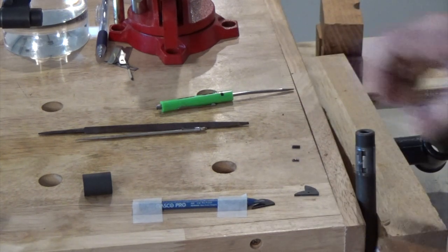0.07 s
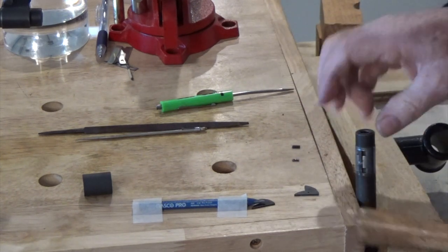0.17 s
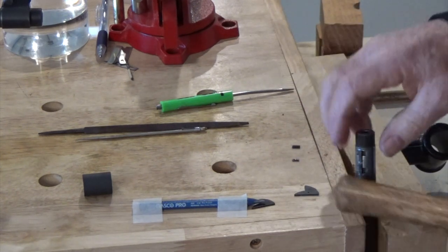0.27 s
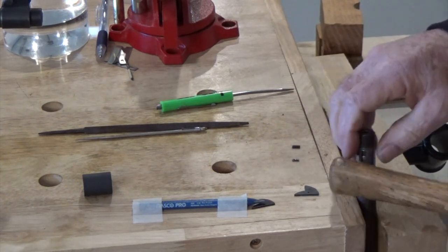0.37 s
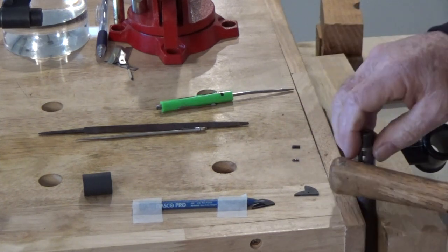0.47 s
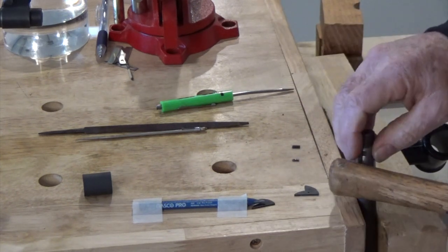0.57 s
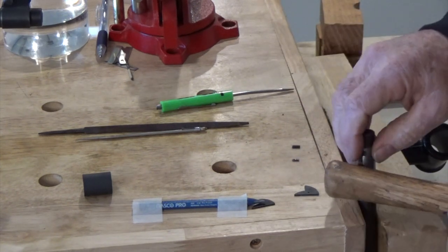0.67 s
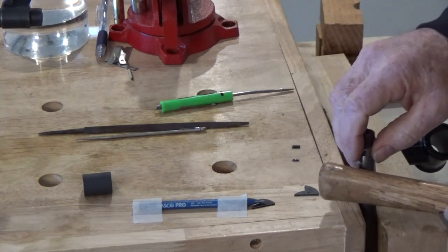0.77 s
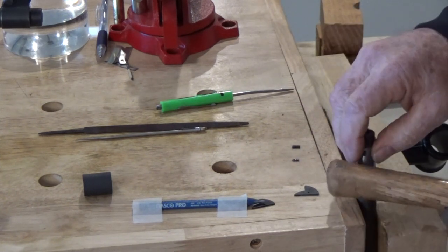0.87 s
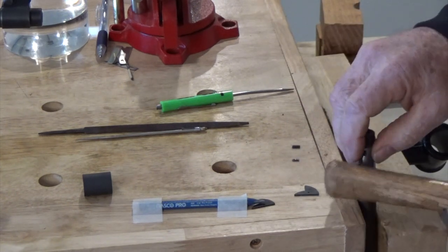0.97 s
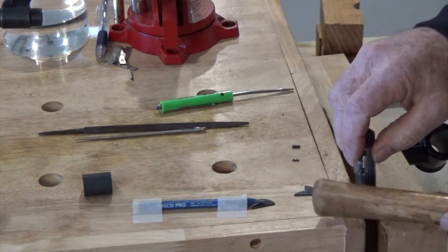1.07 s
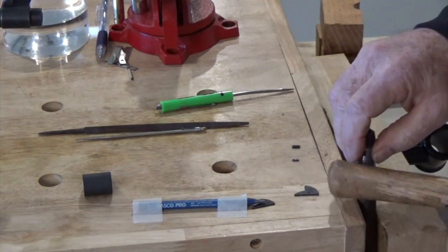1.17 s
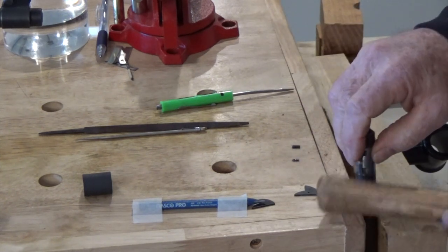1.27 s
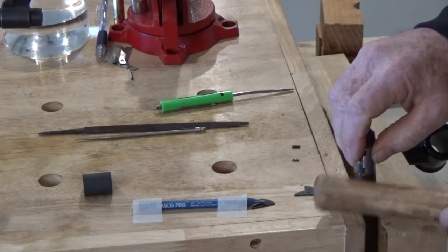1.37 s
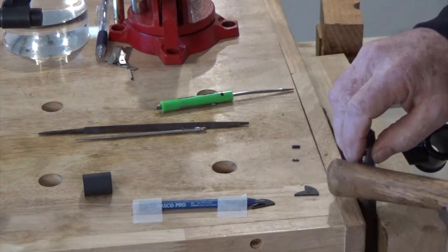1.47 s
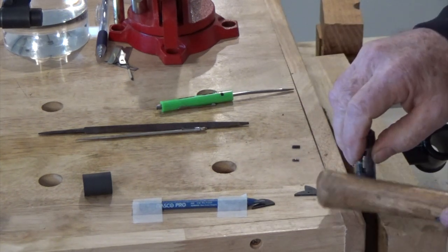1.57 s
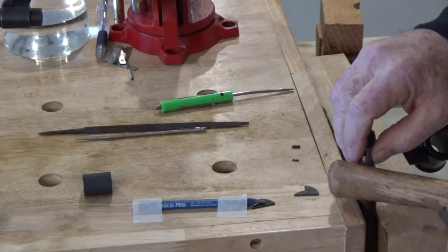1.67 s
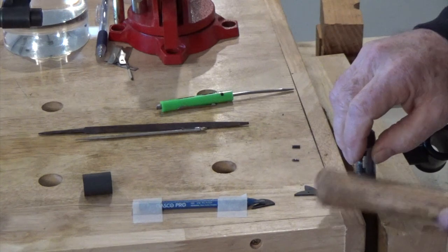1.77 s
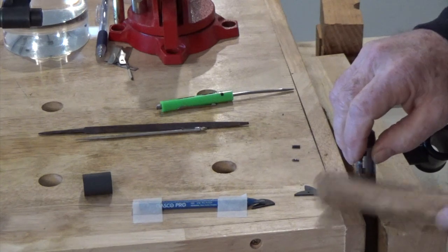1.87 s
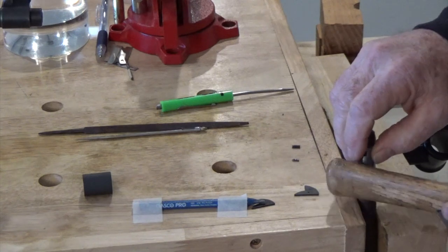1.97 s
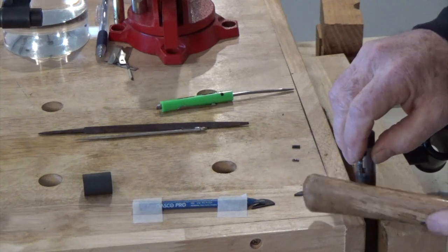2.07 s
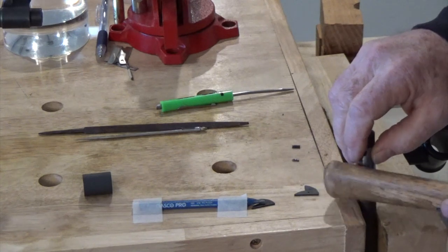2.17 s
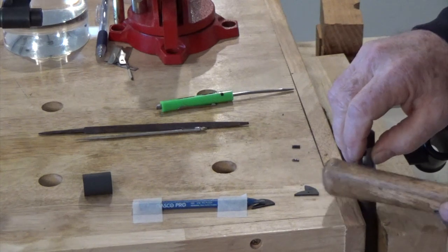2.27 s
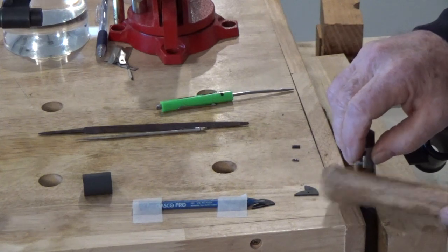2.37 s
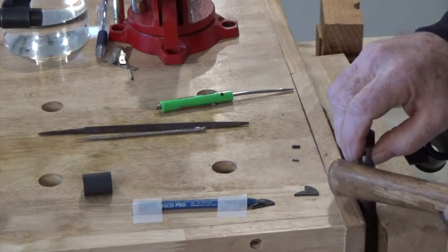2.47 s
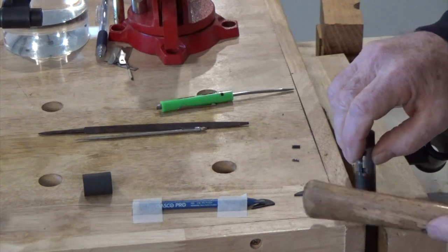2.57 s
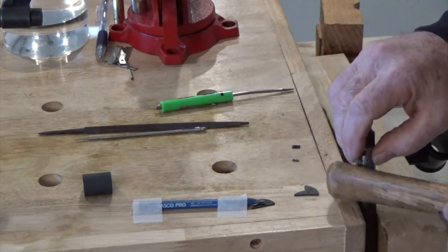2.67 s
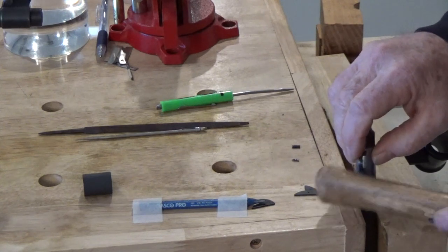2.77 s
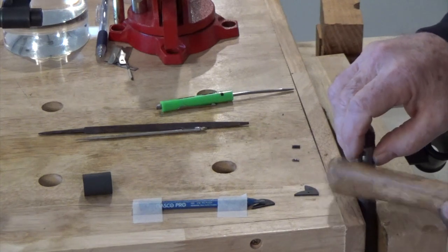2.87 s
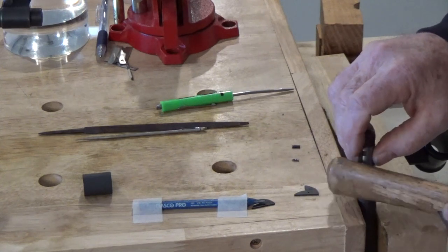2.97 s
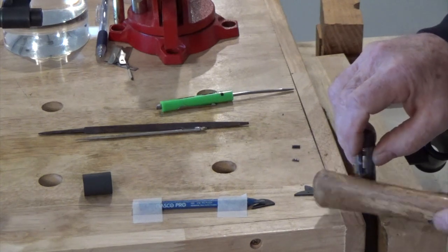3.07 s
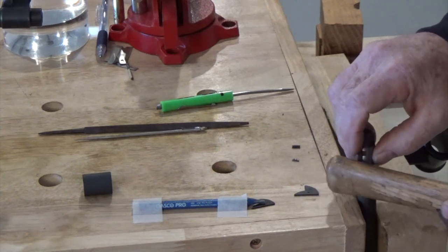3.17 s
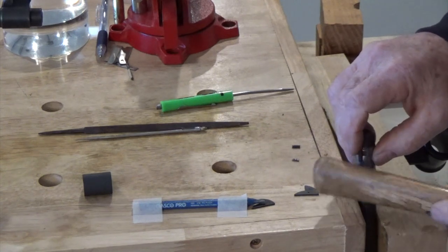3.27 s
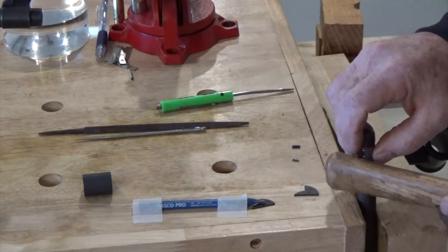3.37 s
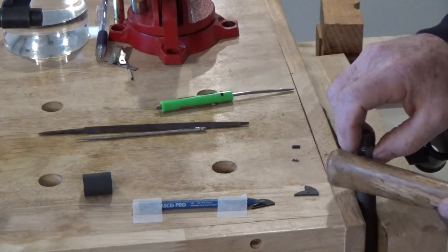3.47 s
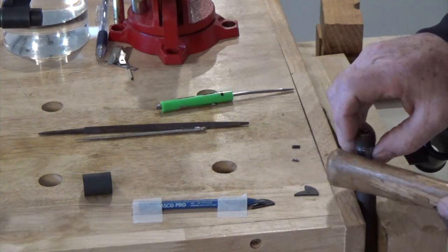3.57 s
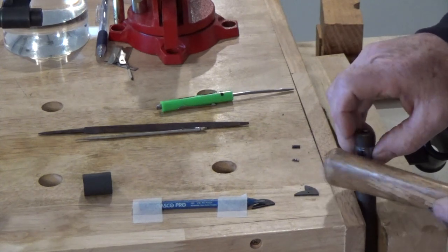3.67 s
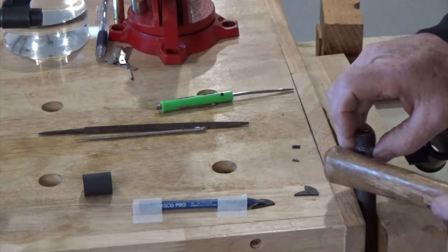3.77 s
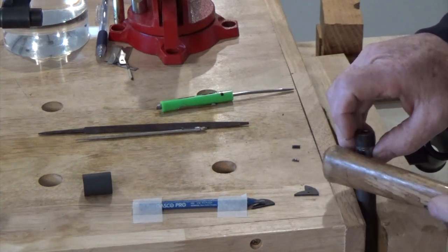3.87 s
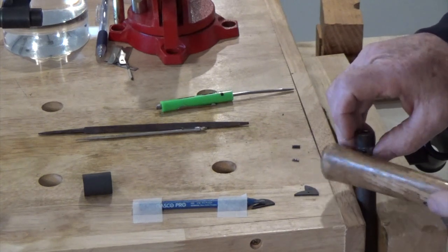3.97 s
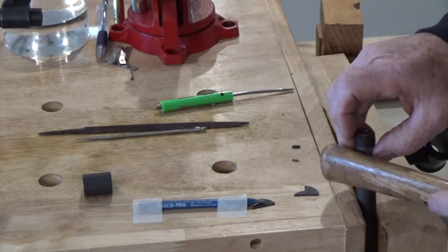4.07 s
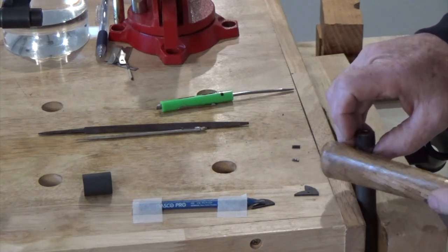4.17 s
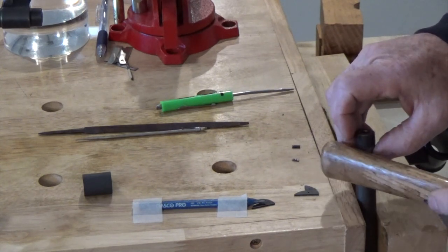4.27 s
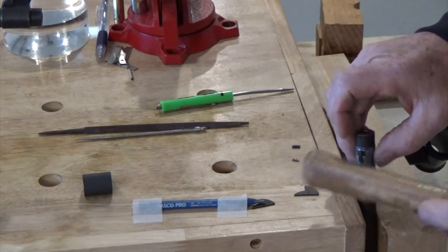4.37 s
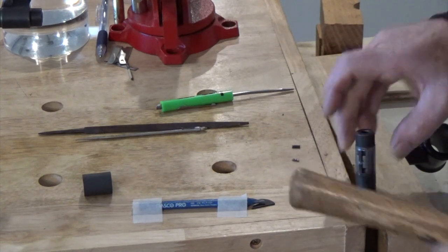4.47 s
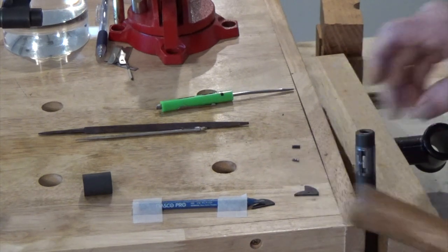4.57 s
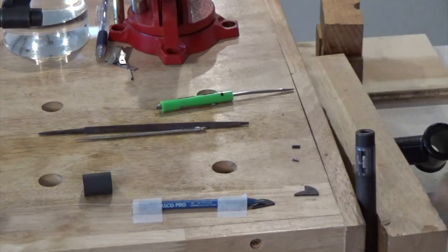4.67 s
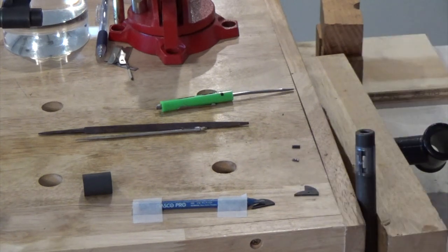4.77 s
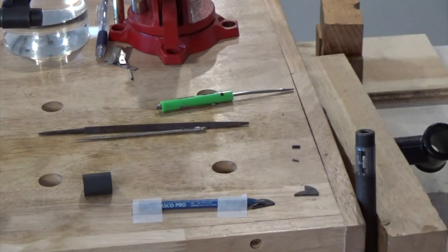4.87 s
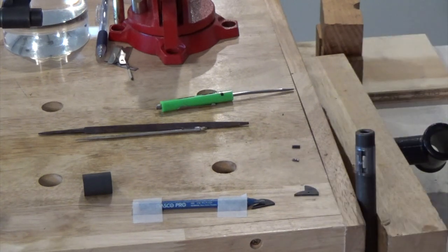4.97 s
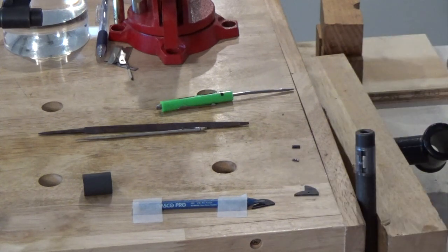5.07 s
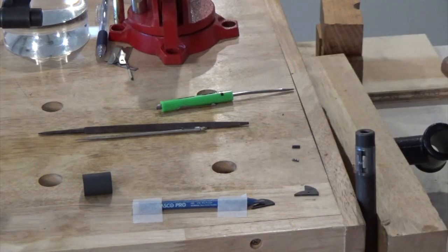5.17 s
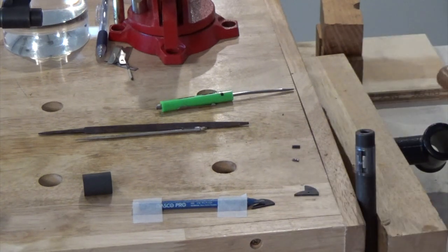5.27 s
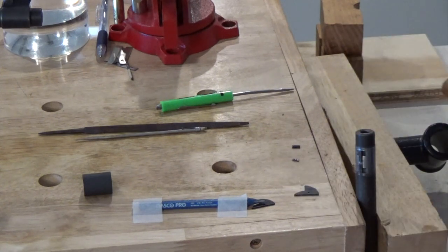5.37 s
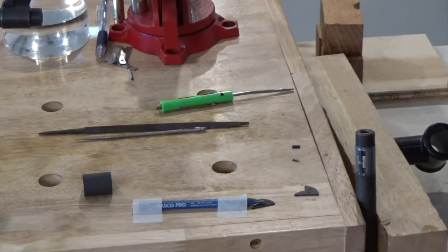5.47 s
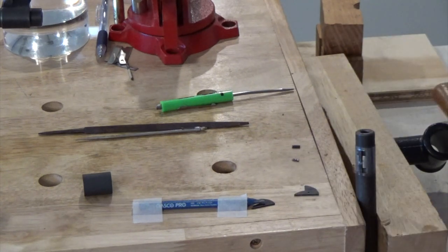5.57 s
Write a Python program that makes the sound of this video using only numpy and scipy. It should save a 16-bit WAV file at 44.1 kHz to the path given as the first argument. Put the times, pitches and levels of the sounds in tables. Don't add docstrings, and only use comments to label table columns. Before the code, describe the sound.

Faint room hiss and a barely audible brush of skin, then sixteen quick mallet blows, each a dry snap, short metal clank and bench knock with little deep bass. Some are light or doubled, others loud and flattened. Hard walls give slap echoes and a reverberant tail. After about a second's pause, a small woody clatter ends it, all heard close in stereo.

```python
import sys
import numpy as np
from scipy import signal
from scipy.fft import rfft, irfft, next_fast_len
from scipy.io import wavfile

SR = 44100
rng = np.random.default_rng(int(sys.argv[2]) if len(sys.argv) > 2 else 0)


def file_out(sig):
    cols = np.atleast_2d(sig).T
    lim = np.clip(cols, -1, 1)
    pcm = np.round(lim * 32767).astype(np.int16)
    wavfile.write(sys.argv[1], SR, pcm)


def decibels_to_gain(level_db):
    exponent = np.asarray(level_db, float) / 20
    return 10 ** exponent


N = 247401

# (push in seconds, spread of starting phase in radians).
STEEL_CONTACT = (0.00004, 0.15)
WOOD_CONTACT = (0.0013, 0.44)
BENCH_CONTACT = (0.0057, 0.25)


def ring(modes, push_s, spread_rad, scatter_db=1.0):
    hz, db, t60 = np.transpose(modes)[:, :, None]
    tuning, energy, turn = rng.standard_normal((3, len(modes), 1))
    t = np.arange(int(t60.max() * SR)) / SR
    phase = np.pi * np.arange(len(modes))[:, None] + spread_rad * turn
    decay = decibels_to_gain(db + scatter_db * energy - 60 * t / t60)
    sines = np.sin(2 * np.pi * hz * (1 + 0.0068 * tuning) * t + phase) * decay
    push = 1 - np.exp(-t / push_s)
    return sines.sum(axis=0) / np.sqrt(len(modes)) * push


def strikes(table, bodies):
    out = np.zeros(N + SR)
    for s, *levels in table:
        for db, (modes, contact) in zip(levels, bodies):
            blow = ring(modes, *contact)
            start = int(s * SR)
            out[start:start + len(blow)] += decibels_to_gain(db) * blow
    return out[:N]


# start in seconds, force into
# the bench in dB, share reaching the steel in dB, contact tick against force in dB, sideways pull on the vise in dB.
BLOWS = [(0.5713, -43.5, -14.5, -17, -17.5), (0.843, -24.5, -11.5, -17, -7), (1.1324, -17.5, 9, -16.5, 1.5),
         (1.4064, -15, -7.5, -15, 3), (1.6395, -9.5, -1.5, -18.5, -10.5), (1.893, -10, 9.5, -12.5, -1.5),
         (2.151, -26.5, -8, -25, 16.5), (2.3873, -12.5, 10, -5.5, -2.5), (2.6389, -23, -6.5, -12.5, -9),
         (2.8777, -11, 2.5, -10.5, 2), (3.1153, -8.5, 3, -6.5, 1), (3.3461, -23, -13.5, -20, 3.5),
         (3.5634, -11, 1, -25.5, -5), (3.7704, -6.5, 4, -9.5, -1), (3.9694, -11.5, 3, -12, 1),
         (4.1763, -10, -0.9, -18, -0.5)]
# frequency in Hz, level in dB, t60 in seconds.
STEEL_CLANK = [(2597, 9, 0.0049), (2916, 5.5, 0.02), (2957, 10, 0.012), (3827, 13.5, 0.0034),
               (4323, 12, 0.0038), (4856, 10, 0.0054), (5650, 7.5, 0.0035), (6220, 6.5, 0.0041),
               (6163, 4, 0.0077), (6910, 1.5, 0.0047), (8460, -8.5, 0.005), (10430, -10.5, 0.0044)]
# frequency in Hz, level in dB, t60 in seconds.
BENCH_KNOCK = [(565, 2, .02), (654, 4.5, 0.011), (789.5, 5, 0.04), (791, -10, 0.051), (855.4, 1.5, 0.022),
               (1063, 9, 0.013), (1247, 7.5, 0.02), (1275, 5.5, 0.029), (1384, -4.5, 0.11),
               (1398, -6.5, 0.073), (1566, 11, 0.013), (1783, 3.5, 0.0079), (2234, 13, .006)]
# frequency in Hz, level in dB, t60 in seconds.
BENCH_THUD = [(105, 6.5, 0.035), (149.5, -5, 0.15), (208, 9, 0.045), (237.7, 10.5, 0.037),
              (313, 3.5, 0.032), (402.3, 8.5, 0.025), (411.5, 9, 0.028)]
# frequency in Hz, level in dB, t60 in seconds.
VISE_RING = [(1052, 6, 0.033), (1134, 14, 0.0057), (1692, 10.5, 0.011), (1897, 1.5, 0.074),
             (1934, -6.5, 0.1), (1837, 3.5, 0.014), (2305, 3.5, 0.0086)]
# frequency in Hz, level in dB, t60 in seconds.
CONTACT_TICK = [(7890, 15.5, 0.0081), (7900, 9.5, 0.0082), (8870, 18.5, 0.0023), (9900, 9, 0.0084),
                (9760, 11.5, 0.0036), (11240, 13.5, 0.0027), (12500, 11, 0.002), (13500, 5, .002),
                (14450, -9.5, .002)]


def mallet_blows():
    s, force_db, steel_db, tick_db, pull_db = np.transpose(BLOWS)
    thud_db = np.minimum(force_db - 6, -43 + 0.64 * (force_db + 24))
    vise_db = force_db - 5.5 + 1.15 * steel_db + pull_db
    rows = zip(s, force_db + steel_db, force_db, thud_db, vise_db, force_db + tick_db)
    return strikes(rows, [(STEEL_CLANK, STEEL_CONTACT), (BENCH_KNOCK, WOOD_CONTACT), (BENCH_THUD, BENCH_CONTACT),
                          (VISE_RING, WOOD_CONTACT), (CONTACT_TICK, STEEL_CONTACT)])


# start in seconds, steel clank in dB, bench thud in dB, contact tick in dB.
SECOND_CONTACTS = [
    (2.1390, -56.5, -43, -54.5),
    (2.6510, -37, -35, -58),
    (3.338, -44.5, -51.5, -48),
]


def bounces():
    return strikes(SECOND_CONTACTS, [(STEEL_CLANK, STEEL_CONTACT), (BENCH_THUD, BENCH_CONTACT),
                                     (CONTACT_TICK, STEEL_CONTACT)])


# start in seconds, level in dB.
SEATED_BLOWS = [
    (1.640, -35),
    (3.116, -14.5),
    (3.770, -12),
    (3.969, -14.5),
    (4.176, -18.5),
]
# frequency in Hz, level in dB, t60 in seconds.
SEATED_PART = [(1352, -0.5, .08), (1450, -2.5, 0.13), (1456, -7.5, 0.12)]


def seated_part():
    return strikes(SEATED_BLOWS, [(SEATED_PART, WOOD_CONTACT)])


# start in seconds, clank in dB, low knock in dB, mid knock in dB, tick in dB.
LANDINGS = [
    (5.4146, -41, -43, -36, -63),
    (5.4754, -33.5, -23.5, -30, -65),
    (5.496, -37.5, -37, -24.5, -65),
    (5.521, -42, -38, -35.5, -74.5),
    (5.553, -49, -48, -33, -66),
]
# frequency in Hz, level in dB, t60 in seconds.
MALLET_HANDLE = [(150, -15, 0.018), (234, 8.5, 0.028), (353, 7.5, 0.034), (420, 6, 0.026),
                 (531, 5.5, 0.039), (673, 4.5, 0.025)]
# frequency in Hz, level in dB, t60 in seconds.
BENCH_BOARD = [(782, 7.3, 0.019), (826, 6.25, 0.024), (1015, 5.1, 0.015), (1336, 5.8, 0.015),
               (1670, 6.3, 0.0108), (2070, 7.5, 0.011)]


def mallet_laid_down():
    return strikes(LANDINGS, [(STEEL_CLANK, STEEL_CONTACT), (MALLET_HANDLE, WOOD_CONTACT),
                              (BENCH_BOARD, WOOD_CONTACT), (CONTACT_TICK, STEEL_CONTACT)])


# frequency in Hz, level in dB, t60 in seconds.
CONTACT_SNAP = [(3100, 6.5, .003), (4600, 4.5, .003), (7000, -8, .002), (9500, 2, .002), (12020, 0.5, .002),
                (14500, -8, .0015)]


def snaps():
    rows = [(s, force_db - 1.5 - 0.06 * steel_db) for s, force_db, steel_db, *_ in BLOWS]
    rows += [(s, clank_db - 3) for s, clank_db, *_ in LANDINGS[:2]]
    return strikes(rows, [(CONTACT_SNAP, STEEL_CONTACT)])


# centre in Hz, width in Hz, level in dB.
BRUSH_BANDS = [(3900, 170, -74), (4450, 200, -74), (8700, 200, -84)]


def finger_brush():
    start_s, rise_s, end_s = 0.21, 0.11, 0.57
    t = np.arange(N) / SR
    shape = np.clip(np.minimum(t - start_s, end_s - t) / rise_s, 0, 1)
    out = np.zeros(N)
    for hz, width_hz, db in BRUSH_BANDS:
        band = signal.butter(2, [hz - width_hz / 2, hz + width_hz / 2], "band", fs=SR, output="sos")
        rustle = signal.sosfilt(band, rng.standard_normal(N))
        out += decibels_to_gain(db) * rustle / rustle.std()
    return out * shape


# delay in milliseconds, level in dB, left minus right in dB, top in Hz.
WALL_ECHOES = [(4.46, -2, -2, 6900), (8.42, -9.5, 5, 4400), (14.78, -12, -1, 8700), (25.77, -2.5, 2.5, 570),
               (29.12, 8, 1, 720), (127.5, -5.5, 0.5, 1100)]
# frequency in Hz, t60 in seconds, level in dB, side minus mid in dB, left minus right in dB.
ROOM_TAIL = [(100, 0.34, -20.5, -32, 0), (250, 0.73, -23.5, -24, 0.5), (500, 0.63, -18.5, -16, 1),
             (1050, 0.65, -23, -9, 1.5), (1897, 0.69, -28, -9, .5), (4300, 0.6, -29, -10, 0.5),
             (8860, 0.41, -31.5, -15.5, 0), (13000, 0.29, -35, -25.5, 0.5)]


def workshop():
    build_up_s = 0.0047
    scatter_db, scatter_t60_s, scatter_from_hz = 9, 0.026, 390
    t = np.arange(SR) / SR
    left_right = np.array([[1], [-1]])
    out = np.zeros((2, SR))
    out[:, 0] = 1
    for ms, db, pan_db, top_hz in WALL_ECHOES:
        dulling = signal.butter(2, top_hz, fs=SR, output="sos")
        echo = signal.sosfilt(dulling, signal.unit_impulse(SR, int(ms * SR / 1000)))
        out += echo * decibels_to_gain(db + pan_db * left_right / 2)
    hz, *columns = np.transpose(ROOM_TAIL)
    edges = 60 * 2 ** np.arange(0, 8.4, 1 / 3)
    for lo, hi in zip(edges, edges[1:]):
        centre = np.log(lo * hi) / 2
        t60, db, side_db, pan_db = (np.interp(centre, np.log(hz), c) for c in columns)
        band = signal.butter(2, [lo, hi], "band", fs=SR, output="sos")
        mid, side = signal.sosfilt(band, rng.standard_normal((2, SR)))
        pair = decibels_to_gain(pan_db * left_right / 2) * (mid + decibels_to_gain(side_db) * side * left_right)
        tail = decibels_to_gain(-60 * t / t60) * (1 - np.exp(-t / build_up_s))
        scatter = decibels_to_gain(scatter_db - 60 * t / scatter_t60_s) * min(lo / scatter_from_hz, 1)
        out += pair * decibels_to_gain(db) * (tail + scatter)
    return out


def shaped(table):
    hz, db = np.transpose(table)
    size = next_fast_len(N)
    f = np.arange(1, size // 2 + 2) * SR / size
    colour = decibels_to_gain(np.interp(np.log(f), np.log(hz), db))
    x = irfft(rfft(rng.standard_normal(size)) * colour, size)[:N]
    return x / x.std()


# frequency in Hz, level in dB per Hz.
HISS_MID = [(15, -57), (25, -35), (48, -18.5), (226, -8.5), (410, -6), (800, -9), (1100, -7.5), (3000, -13),
            (4500, -12.5), (6500, -17.5), (9000, -17.5), (13000, -21.5), (15500, -24.5), (16500, -42)]
# frequency in Hz, level in dB per Hz.
HISS_BETWEEN = [(15, -67.5), (25, -44.5), (252, -8), (726, -1.5), (952, 1), (4360, -14.5), (6550, -19),
                (7300, -45.5), (16500, -53)]


def hiss():
    rest_db, murmur_db, murmur_s = -4.2, 6, 1
    dropout_s, dropout_width_s, dropout_depth = 4.96, 0.0048, 0.99
    t = np.arange(N) / SR
    mid = shaped(HISS_MID) * decibels_to_gain(-63)
    side = shaped(HISS_BETWEEN) * decibels_to_gain(-68.5)
    since_last_s = np.maximum(t - BLOWS[-1][0], 0)
    lift_db = murmur_db * np.exp(-since_last_s / murmur_s) * (t > BLOWS[2][0])
    dropout = 1 - dropout_depth * np.exp(-((t - dropout_s) / dropout_width_s) ** 2)
    return np.array([mid + side, mid - side]) * decibels_to_gain(rest_db + lift_db) * dropout


def scene():
    struck = mallet_blows() + bounces() + seated_part() + mallet_laid_down()
    heard = signal.oaconvolve(struck[None], workshop(), axes=1)[:, :N]
    capsule = signal.butter(2, 211, "high", fs=SR, output="sos")
    return signal.sosfilt(capsule, heard) + hiss() + finger_brush() + snaps()


def follow(x, attack_s, release_s, size=32):
    peaks = np.pad(x, (0, -len(x) % size)).reshape(-1, size).max(axis=1)
    out, level = [], 1e-9
    for peak in peaks.tolist():
        time_s = attack_s if peak > level else release_s
        level += (peak - level) * min(size / SR / time_s, 1)
        out.append(level)
    return np.interp(np.arange(len(x)), (np.arange(len(out)) + 1) * size, out)


def band_limit(x):
    return signal.sosfilt(signal.butter(12, 16830, fs=SR, output="sos"), x)


def record(dry):
    limit_db, limit_ratio = -11, 2.97
    attack_s, release_s, look_ahead_s = 0.00027, 0.009, 0.00036
    level = follow(np.abs(dry).max(axis=0), attack_s, release_s)
    level = np.roll(level, -int(look_ahead_s * SR))
    gain = np.minimum(decibels_to_gain(limit_db) / level, 1) ** (1 - 1 / limit_ratio)
    top_cut = signal.ellip(10, 0.5, 60, 16500, fs=SR, output="sos")
    mix = signal.sosfilt(top_cut, dry * gain)
    return band_limit(mix)


dry = scene()
out = record(dry)
file_out(out)
```